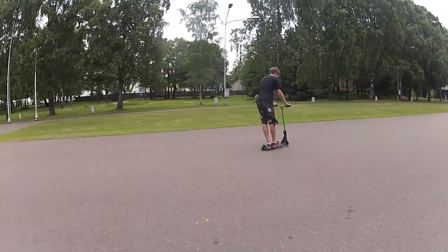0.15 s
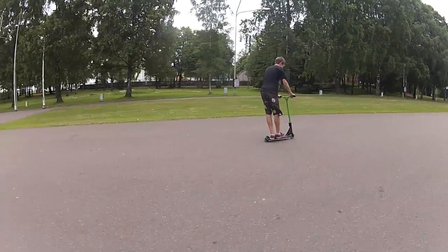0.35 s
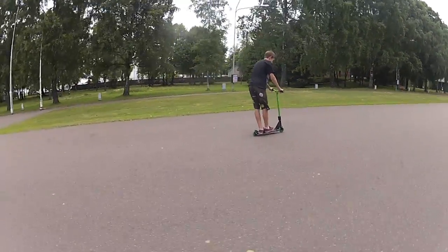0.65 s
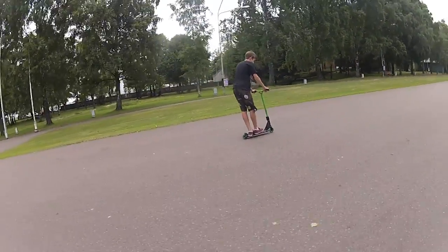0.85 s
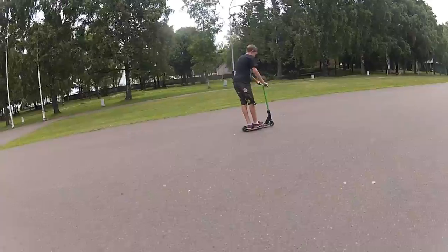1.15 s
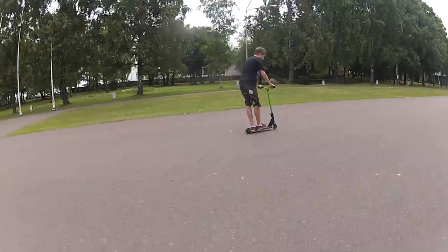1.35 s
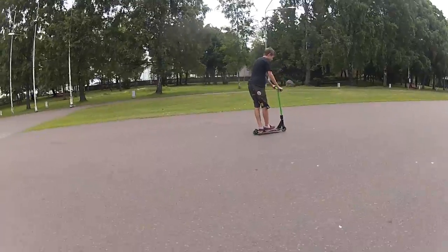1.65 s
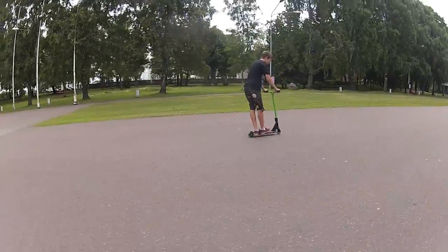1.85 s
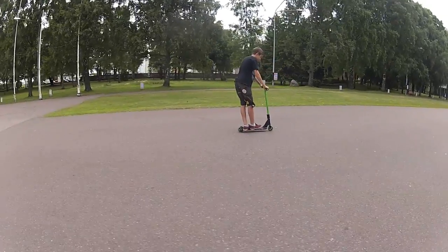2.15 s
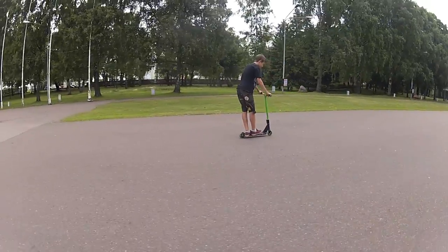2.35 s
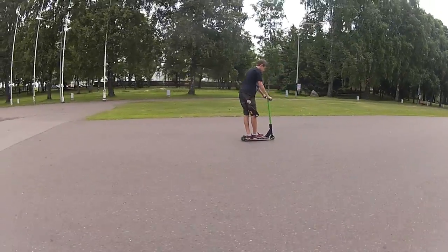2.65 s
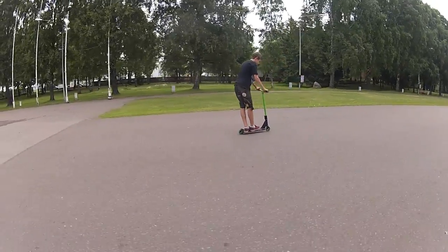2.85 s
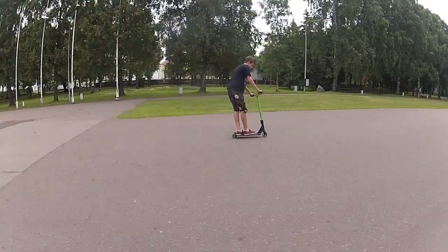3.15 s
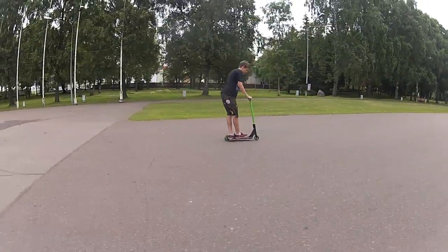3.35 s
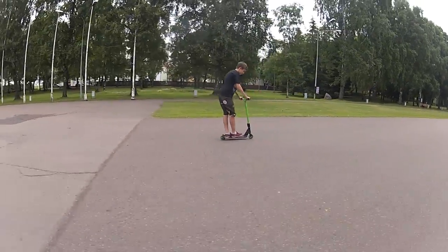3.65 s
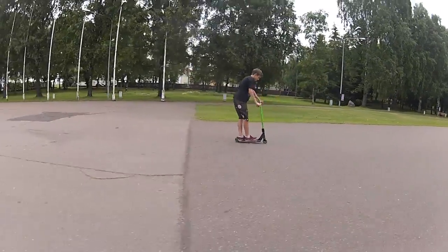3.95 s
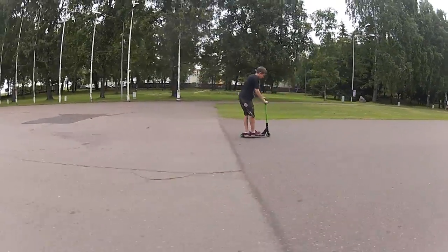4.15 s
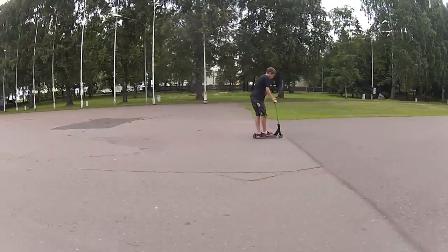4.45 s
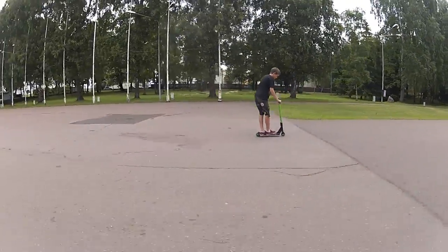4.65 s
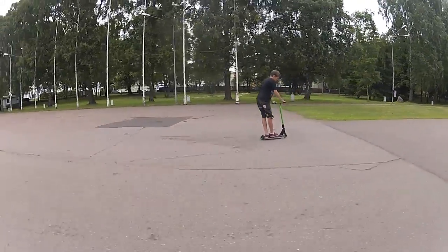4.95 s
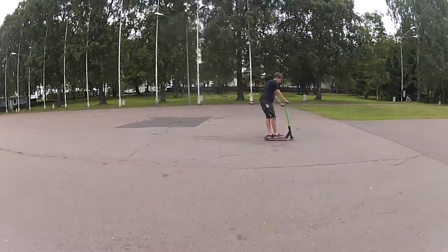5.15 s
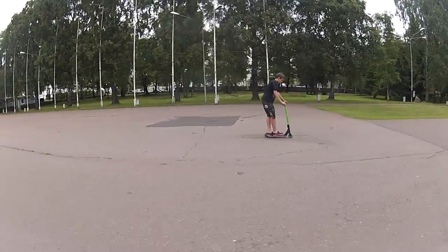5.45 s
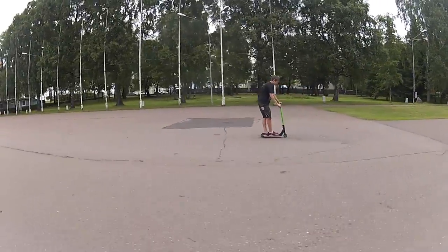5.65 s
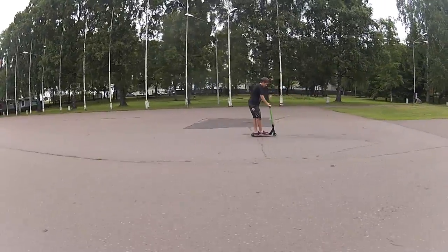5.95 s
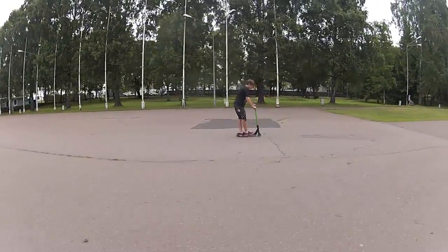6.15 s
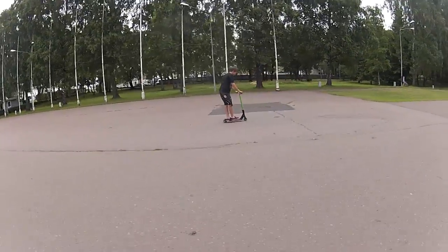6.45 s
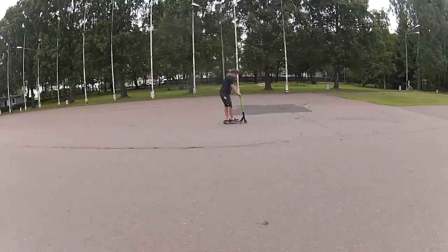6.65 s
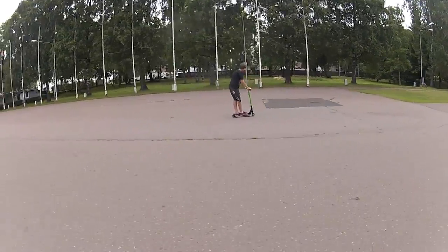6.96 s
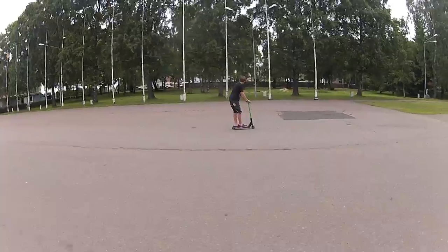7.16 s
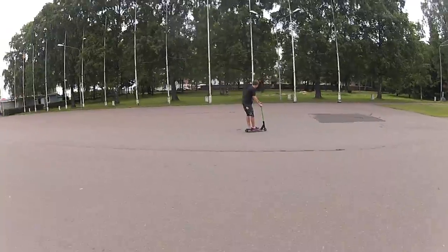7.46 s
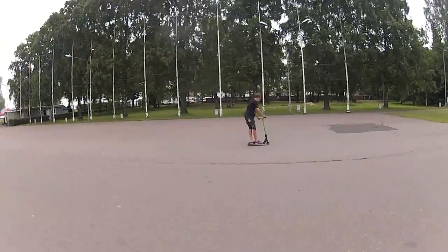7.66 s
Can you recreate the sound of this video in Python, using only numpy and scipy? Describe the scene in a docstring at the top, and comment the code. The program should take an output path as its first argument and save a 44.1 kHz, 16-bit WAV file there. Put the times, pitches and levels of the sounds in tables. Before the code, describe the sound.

Small scooter wheels rumble quietly over gritty asphalt with low wind buffeting, broken by one loud deck clack and later crunchy tyre scuffs.

```python
"""Stunt scooters roll across an asphalt plaza, heard from a small housed microphone carried along.
Throughout: grit contacts rumble, hiss and ring the wheels; air buffets the microphone over a faint hush.
0.1-2.4 s: four light chirrups, with sideways scrubs at 0.5-0.7 s; from 0.8 s single pebbles skitter.
2.9 s: deck and fork clack with a low thump, then the tyre scuffs twice.
6.5-7.6 s: scuffs resume, air pops once on the microphone (6.54 s), and three weaker clacks follow (7.4 s)."""
import sys
import numpy as np
from scipy import signal
from scipy.fft import rfft, irfft, next_fast_len
from scipy.io import wavfile

SR = 44100
rng = np.random.default_rng(int(sys.argv[2]) if len(sys.argv) > 2 else 0)


def wav_record(signal):
    """Record a signal, one row per channel, as 16-bit PCM in the file named by sys.argv[1]."""
    frames = np.transpose(np.atleast_2d(signal))
    bounded = np.clip(frames, -1, 1)
    # unit amplitude maps onto the largest positive 16-bit level
    quanta = np.round(bounded * 32767).astype(np.int16)
    wavfile.write(sys.argv[1], SR, quanta)


N = 343539
TIME_S = np.arange(N) / SR

# rolling level set by speed and surface: (time [s], level [dB])
ROLL_LEVEL = [(0, -44.5), (.7, -46), (1.6, -44.5), (2.7, -43.5), (3.3, -45), (4.05, -44), (4.4, -42.5),
              (5.9, -44.5), (6.7, -43), (7.2, -44), (7.79, -44)]
# rumble spectrum: (frequency [Hz], density [dB per Hz])
RUMBLE_SPECTRUM = [(82, -5.5), (140, -10.5), (182, -9), (243, -1.5), (369, -9.5), (396, -12.5), (425, -13),
                   (476, -10.5), (572, -18), (646, -13), (833, -20), (1040, -17), (1140, -20.5),
                   (1290, -26.5), (1600, -31), (2080, -71), (3520, -120)]
# grit hiss spectrum: (frequency [Hz], density [dB per Hz])
GRIT_SPECTRUM = [(880, -25), (1500, -16.5), (1880, -1), (2410, -2.5), (2740, -12), (3380, -10.5),
                 (4690, -17), (6000, -16), (7240, -19), (9100, -20), (9850, -23.5), (11500, -23),
                 (14200, -23), (15500, -28), (16000, -64)]
# resonances kept ringing by rolling wheels: (frequency [Hz], width [Hz], level [dB])
WHEEL_MODES = [(1145, 36, 6), (1834, 39, 6.5), (9710, 190, -8.5), (10120, 57, -4.5), (14340, 160, -8.5)]
# tyre scuffs over loose grit: (peak time [s], level [dB], swell [s], fade [s])
SCUFFS = [(2.945, -38.5, .018, 0.038), (3.01, -39.5, 0.027, .016), (6.472, -36.5, 0.042, 0.027),
          (6.56, -40, 0.051, .06), (6.93, -34.5, 0.091, 0.077), (7.125, -36.5, 0.069, 0.1),
          (7.23, -30, 0.035, 0.024), (7.28, -38.5, 0.017, 0.033), (7.59, -49, 0.15, 0.14)]
# resonances of a skidding wheel: (frequency [Hz], width [Hz], level [dB])
SCUFF_MODES = [(1160, 114, -3.5), (1900, 260, -3), (2356, 105, 2), (3050, 210, -7.5), (4930, 350, -10.5),
               (7100, 180, -12), (9660, 150, -10), (10760, 200, -18), (13400, 200, -18), (14500, 150, -17)]
# scuff hiss spectrum: (frequency [Hz], density [dB per Hz])
SCUFF_SPECTRUM = [(410, -42), (700, -9), (1260, 2), (1600, -6), (2400, -11.5), (4920, -20.5), (5990, -15),
                  (7010, -20), (9860, -20.5), (12300, -30), (14200, -16), (15400, -27), (16000, -53)]
# sideways tyre scrubs: (peak time [s], level [dB], swell [s], fade [s])
SCRUBS = [(.505, -35, 0.043, 0.1), (.59, -37, 0.013, 0.017), (.665, -35.5, 0.039, 0.037),
          (.73, -46, 0.027, 0.033)]
# wheel resonances in a scrub: (frequency [Hz], width [Hz], level [dB])
SCRUB_MODES = [(1897, 48, 3), (2244, 47, 3.5), (3000, 50, -12), (4070, 310, -17.5), (5000, 150, -12.5),
               (7080, 110, -15.5), (9670, 160, -11), (10100, 77, -13), (13900, 70, -14), (14400, 180, -16)]
# slip hiss spectrum: (frequency [Hz], density [dB per Hz])
SCRUB_SPECTRUM = [(1600, -20), (1850, 10), (2080, -29), (2350, 24), (2700, -30), (3100, 7), (5000, -19),
                  (6000, -8), (8200, -4), (11000, -20), (13300, -33), (15500, -9)]
# chirrups of a tyre on the edge of slipping: (peak time [s], level [dB], half length [s])
CHIRRUPS = [(0.116, -43.5, 0.042), (0.663, -46.5, 0.033), (1.57, -44, 0.05), (2.43, -45.5, .09)]
# freest resonances, woken by a light slip: (frequency [Hz], width [Hz], level [dB])
CHIRRUP_MODES = [(1910, 46, 2), (9980, 96, -14), (14000, 150, -19)]
# clacks of deck and fork, relative levels:
# (time [s], first blow [dB], chatter [dB], deck share [dB], rise [s], hold [s], fall t60 [s])
CLACKS = [(2.8521, 1, -17.5, 2.5, 0.00096, 0.019, 0.09), (7.4198, -27, -17.5, 3.5, 0.0074, 0.024, 0.06),
          (7.491, -48, -25.5, -3, 0.0095, 0.041, 0.13), (7.553, -55, -33, 2.5, 0.012, 0.011, 0.083)]
# ringing of the deck: (frequency [Hz], width [Hz], level [dB])
DECK_MODES = [(308, 80, -20.5), (760, 110, -6), (856, 160, -6), (1028, 115, -2), (1434, 140, -11.5),
              (1607, 60, -3.5), (1840, 180, -4.5), (2150, 160, -4), (2326, 290, -8)]
# ringing of fork and bar: (frequency [Hz], width [Hz], level [dB])
FORK_MODES = [(3210, 200, -3.5), (3730, 390, -10.5), (4070, 450, -18.5), (8260, 440, -17), (8680, 140, -8),
              (10450, 300, -16), (13300, 290, -22), (14900, 210, -16)]
# short smack of wheel on ground: (frequency [Hz], width [Hz], level [dB])
SMACK_MODES = [(940, 120, 4), (1210, 400, -8), (2020, 82, 7.5), (3450, 180, -5)]
# soft low bumps with the clacks: (time [s], relative level [dB])
THUMPS = [(2.8522, -6), (7.435, -23)]
# pebbles flicked by a wheel: (time [s], relative level [dB])
PEBBLES = [(0.7557, -37), (2.7756, -39), (2.81, -38), (3.9898, -46), (4.1294, -46.5), (4.4593, -44),
           (4.7894, -44), (5.2794, -45), (5.424, -45), (6.2794, -38.5)]
# ringing of a pebble: (frequency [Hz], width [Hz], level [dB])
PEBBLE_MODES = [(3490, 820, 1), (5080, 140, 6), (8780, 330, 4)]
# air puffs on the microphone: (centre time [s], peak [dB], centre-to-peak time [s])
PUFFS = [(6.5426, -8.5, .0013)]
# airflow over the microphone: (time [s], level [dB])
AIRFLOW_LEVEL = [(0, -46), (.6, -40), (1.0, -42.5), (2.2, -45), (2.75, -38.5), (3.2, -43.5), (4.05, -42.5),
                 (4.3, -37.5), (5.4, -43), (6.27, -36), (6.7, -41.5), (7.2, -38.5), (7.79, -39.5)]
# wind spectrum: (frequency [Hz], density [dB per Hz])
WIND_SPECTRUM = [(12, -5), (20, 1.5), (58, 2), (69, -3.5), (86, -9.5), (170, -12.5), (220, -16),
                 (370, -120)]
# hush spectrum: (frequency [Hz], density [dB per Hz])
HUSH_SPECTRUM = [(24, -34), (40, -8), (193, 2.5), (1160, -16), (1500, -14), (2260, -26), (4000, -9.5),
                 (5330, -13), (6010, -19), (7270, -11), (12000, -64), (15600, -88), (22000, -120)]
# bands weakened by the housing: (frequency [Hz], width [Hz], share removed [0-1])
HOUSING_BANDS = [(6000, 2070, 0.85), (12230, 680, 0.36)]


def from_db(db):
    """Decibels to amplitude gain."""
    return 10 ** (np.asarray(db) / 20)


def rms_one(x):
    """Scale to unit power."""
    return x / np.sqrt(np.mean(x ** 2) + 1e-20)


def noise():
    """White Gaussian noise."""
    return rng.standard_normal(N)


def drift(rate_hz):
    """Low-passed noise of unit RMS: slow random variation."""
    bins_hz = np.arange(N // 2 + 1) * SR / N
    return rms_one(irfft(rfft(noise()) / (1 + (bins_hz / rate_hz) ** 2), N))


def colour(x, spectrum):
    """Shape a steady sound by a spectrum interpolated over log frequency; unit power."""
    points_hz, points_db = np.transpose(spectrum)
    size = next_fast_len(N)
    bins_hz = np.maximum(np.arange(size // 2 + 1) * SR / size, 1)
    gain_db = np.interp(np.log(bins_hz), np.log(points_hz), points_db, left=-90, right=-90)
    return rms_one(irfft(rfft(x, size) * from_db(gain_db), size)[:N])


def resonate(x, modes):
    """Parallel two-pole resonators with alternating signs."""
    out = np.zeros(N)
    for k, (freq_hz, width_hz, level_db) in enumerate(modes):
        radius = np.exp(-np.pi * width_hz / SR)
        poles = [1, -2 * radius * np.cos(2 * np.pi * freq_hz / SR), radius ** 2]
        gain = (-1) ** k * from_db(level_db) * (1 - radius ** 2) / 2
        out += gain * signal.lfilter([1, 0, -1], poles, x + 1e-18)  # offset avoids denormals
    return out


def grains(per_s, spread_db):
    """Tiny contacts at random moments, of uneven size and random sign; unit power."""
    size_db = spread_db * np.minimum(rng.exponential(1, N), 4)
    impulses = from_db(size_db) * rng.choice([-1, 1], N)
    return rms_one(impulses * (rng.random(N) < per_s / SR))


def swells(events):
    """Each slip swells and fades as the tyre grips again; overlapping slips add in power."""
    power = np.zeros(N)
    for peak_s, level_db, swell_s, fade_s in events:
        u = (TIME_S - peak_s) / np.where(TIME_S < peak_s, swell_s, fade_s)
        power += (from_db(level_db) * np.exp(-np.minimum(u * u, 20))) ** 2
    return np.sqrt(power)


def roll_level_db():
    """Rolling level over time, set by speed and surface."""
    return np.interp(TIME_S, *np.transpose(ROLL_LEVEL))


def rumble(road_hz=18, road_db=0.35, skid_db=-9):
    """Wheels strike coarse asphalt in dense contacts; uneven road and skids vary the level."""
    rolling_gain = from_db(roll_level_db() + road_db * drift(road_hz))
    gain = np.hypot(rolling_gain, from_db(skid_db) * swells(SCUFFS))
    return gain * colour(grains(5000, spread_db=1.5), RUMBLE_SPECTRUM)


def grit(mean_db=-50.5, rumble_share=0.31, skid_db=-17, wheel_ring_db=-5):
    """Fine grit hisses and rings the wheels, following part of the rumble's swing; skids add to it."""
    roll_db = roll_level_db()
    rolling_gain = from_db(mean_db + rumble_share * (roll_db - roll_db.mean()))
    gain = np.hypot(rolling_gain, from_db(skid_db) * swells(SCUFFS))
    hiss = colour(grains(11000, spread_db=3.5), GRIT_SPECTRUM)
    wheel = rms_one(resonate(grains(9000, spread_db=3.5), WHEEL_MODES))
    return gain * (hiss + from_db(wheel_ring_db) * wheel)


def scuff(ringing_db=-2, hiss_db=-4, judder_db=2.0, judder_hz=45):
    """Grit crunches under a juddering, skidding tyre: partly ringing, partly broad hiss."""
    crunch = grains(9000, spread_db=2)
    spray = grains(9000, spread_db=2)
    judder = from_db(judder_db * drift(judder_hz))
    ringing = from_db(ringing_db) * rms_one(resonate(crunch * judder, SCUFF_MODES))
    hiss = from_db(hiss_db) * judder * colour(spray, SCUFF_SPECTRUM)
    return swells(SCUFFS) * (ringing + hiss)


def scrub(singing_db=-1, hiss_db=-6, jerk_db=0.78, jerk_hz=50):
    """A slipping tyre jerks densely: it hisses and sings in the wheel, or chirrups when barely slipping."""
    slips = noise() * from_db(jerk_db * drift(jerk_hz))
    singing = from_db(singing_db) * rms_one(resonate(slips, SCRUB_MODES))
    hiss = from_db(hiss_db) * colour(noise(), SCRUB_SPECTRUM)
    light_gain = np.zeros(N)
    for peak_s, level_db, half_s in CHIRRUPS:
        light_gain += from_db(level_db) * np.exp(-((TIME_S - peak_s) / half_s) ** 2)
    chirrup = light_gain * rms_one(resonate(slips, CHIRRUP_MODES))
    return swells(SCRUBS) * (singing + hiss) + chirrup


def clacks(blow_t60_s=0.0032, smack_db=23, deck_db=15, fork_db=16, crack_hz=1200):
    """A blow, then loose parts chatter against each other, ringing deck and fork."""
    fork_force, deck_force, blows = np.zeros((3, N))
    for start_s, blow_db, chatter_db, deck_share_db, rise_s, hold_s, t60_s in CLACKS:
        age_s = np.maximum(TIME_S - start_s, 0)
        blows[round(start_s * SR)] = from_db(blow_db + smack_db)
        force = from_db(blow_db - 60 * np.minimum(age_s / blow_t60_s, 5)) * (age_s > 0)
        chatter_fall_db = 60 * np.clip((age_s - hold_s) / t60_s, 0, 5)
        force += np.minimum(age_s / rise_s, 1) * from_db(chatter_db - chatter_fall_db)
        fork_force += force
        deck_force += from_db(deck_share_db) * force
    contacts = grains(20000, spread_db=1)
    deck = from_db(deck_db) * resonate(contacts * deck_force, DECK_MODES)
    fork = from_db(fork_db) * resonate(contacts * fork_force, FORK_MODES)
    smack = resonate(blows, SMACK_MODES)
    lowpass = signal.butter(1, crack_hz, fs=SR, output="sos")
    crack = signal.sosfilt(lowpass, contacts * deck_force)
    return deck + fork + smack + crack


def thumps():
    """Each jolt shakes the microphone: two damped low sines."""
    modes = ((50, 20, -4), (140, 95, 2))  # (frequency [Hz], width [Hz], level [dB]): body, knock
    out = np.zeros(N)
    for start_s, level_db in THUMPS:
        age_s = np.clip(TIME_S - start_s, 0, .5)
        for freq_hz, width_hz, mode_db in modes:
            swing = np.sin(2 * np.pi * freq_hz * age_s) * np.exp(-np.pi * width_hz * age_s)
            out += from_db(level_db + mode_db) * swing
    return out


def pebbles(t60_s=0.065, skitter_db=-8):
    """Each flicked pebble skitters in a decaying run of ringing touches."""
    force = np.zeros(N)
    for start_s, level_db in PEBBLES:
        fall_db = 60 * np.clip((TIME_S - start_s) / t60_s, 0, 5)
        force += (TIME_S > start_s) * from_db(level_db + skitter_db - fall_db)
    touches = grains(4000, spread_db=2)
    return force * rms_one(resonate(touches, PEBBLE_MODES))


def puffs(flutter_db=-13):
    """An eddy passes the port: pressure swells, swings to suction and settles, hissing at its core."""
    out = np.zeros(N)
    flutter = from_db(flutter_db) * colour(noise(), SCUFF_SPECTRUM)
    for centre_s, peak_db, width_s in PUFFS:
        u = (TIME_S - centre_s) / width_s
        core = 1 / (1 + u * u / 3) ** 2
        swing = -u * core * (4 / 3) ** 2  # peaks of 1 at u = -1, +1
        out += from_db(peak_db) * (swing + core * flutter)
    return out


def wind(gust_db=2.35, gust_hz=14):
    """Airflow buffets the microphone as low noise with random lumps."""
    air_db = np.interp(TIME_S, *np.transpose(AIRFLOW_LEVEL))
    return from_db(air_db + gust_db * drift(gust_hz)) * colour(noise(), WIND_SPECTRUM)


def hush(level_db=-66.5):
    """Faint steady coloured noise."""
    return from_db(level_db) * colour(noise(), HUSH_SPECTRUM)


def scene(copy_db=-44, delay_s=0.0037):
    """Centred sources; a faint delayed copy and the hush enter the two sides inverted, giving slight width."""
    mono = rumble() + grit() + scuff() + scrub() + clacks() + thumps() + pebbles() + puffs() + wind()
    delayed_copy = from_db(copy_db) * np.interp(TIME_S - delay_s, TIME_S, mono, left=0)
    side = delayed_copy + hush()
    return np.array([mono + side, mono - side])


def record(dry, cutoff_hz=15450):
    """The housing weakens two bands, peaks beyond full scale clip, a steep low-pass cuts the top."""
    for freq_hz, width_hz, share in HOUSING_BANDS:
        band = signal.lfilter(*signal.iirpeak(freq_hz, freq_hz / width_hz, fs=SR), dry)
        dry = dry - np.clip(share, 0, 1) * band
    lowpass = signal.ellip(10, .1, 80, cutoff_hz, fs=SR, output="sos")
    return signal.sosfilt(lowpass, np.clip(dry, -1, 1))


dry = scene()
out = record(dry)
wav_record(out)
```